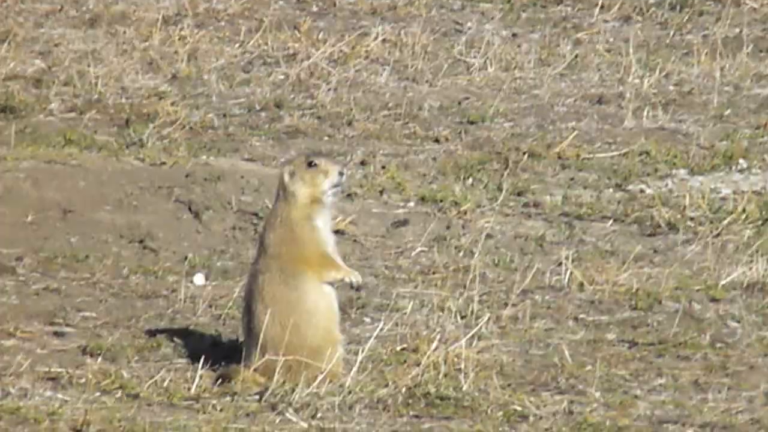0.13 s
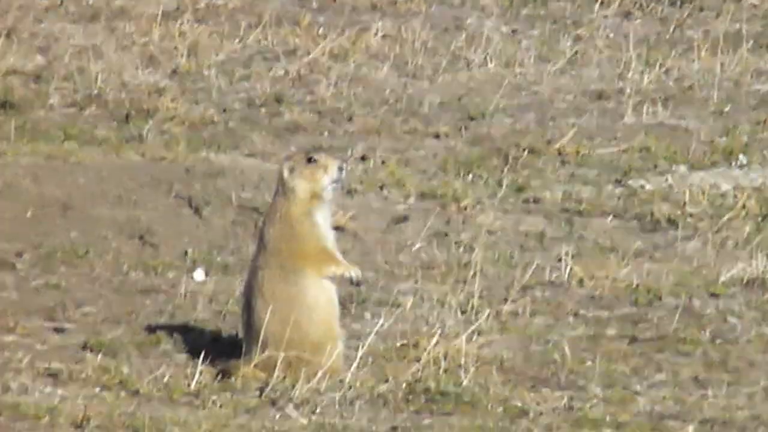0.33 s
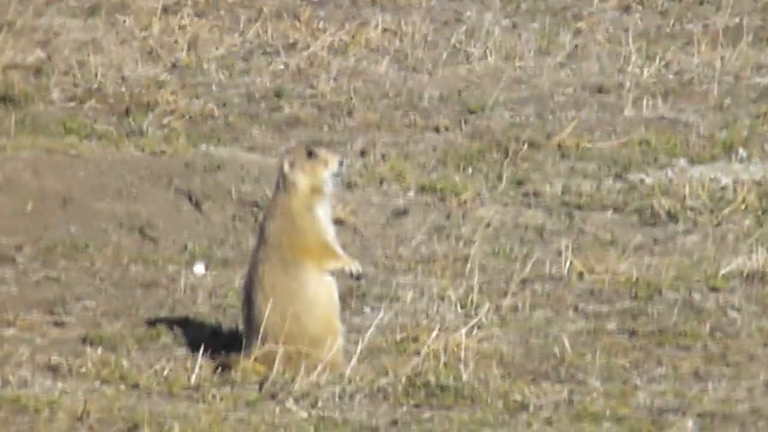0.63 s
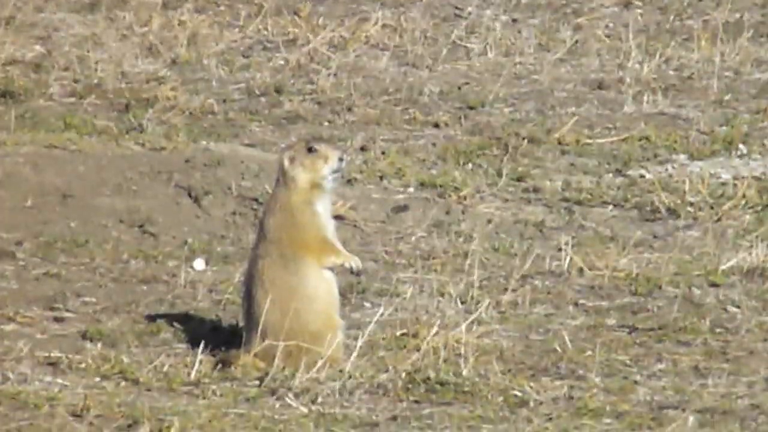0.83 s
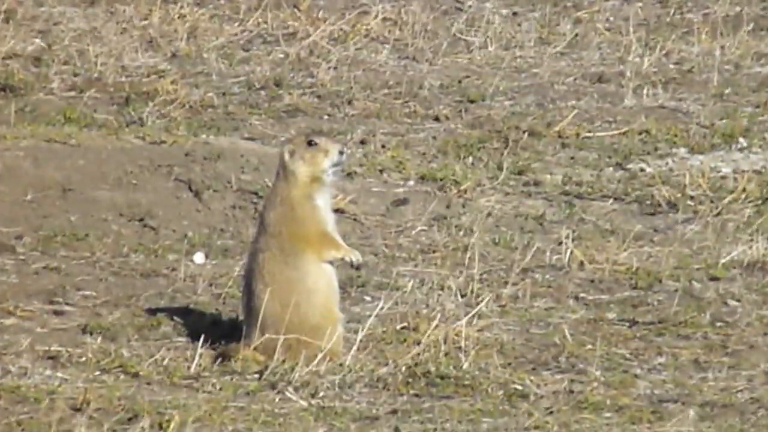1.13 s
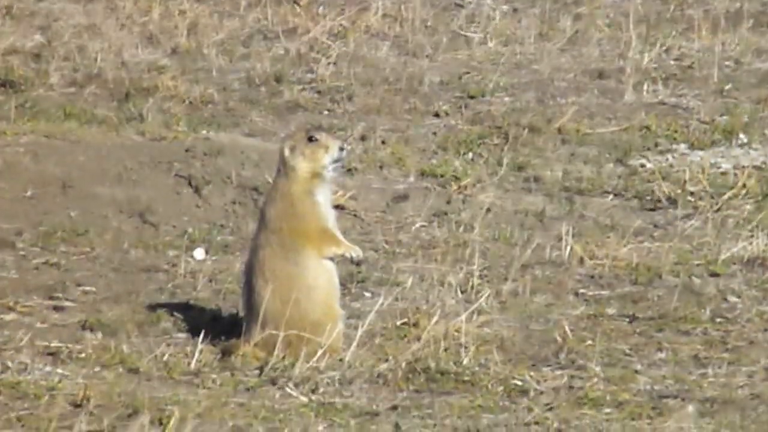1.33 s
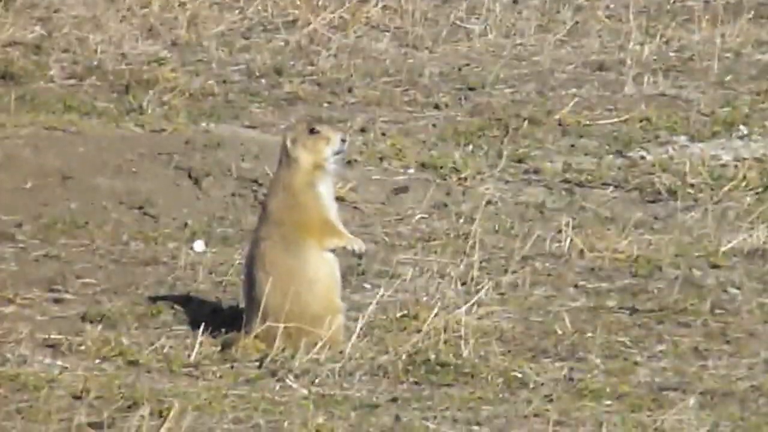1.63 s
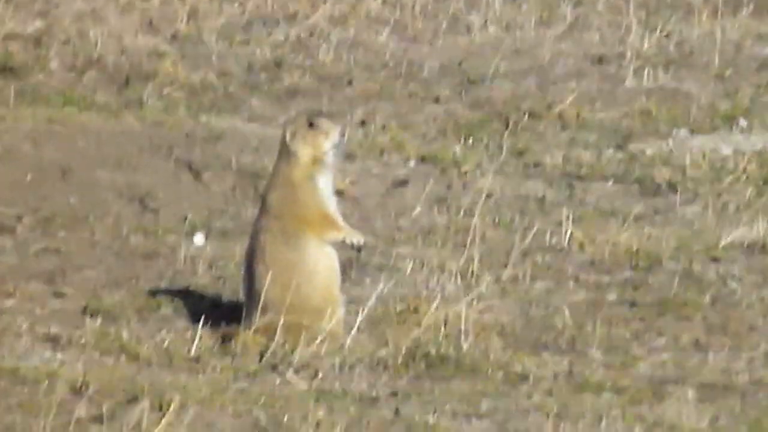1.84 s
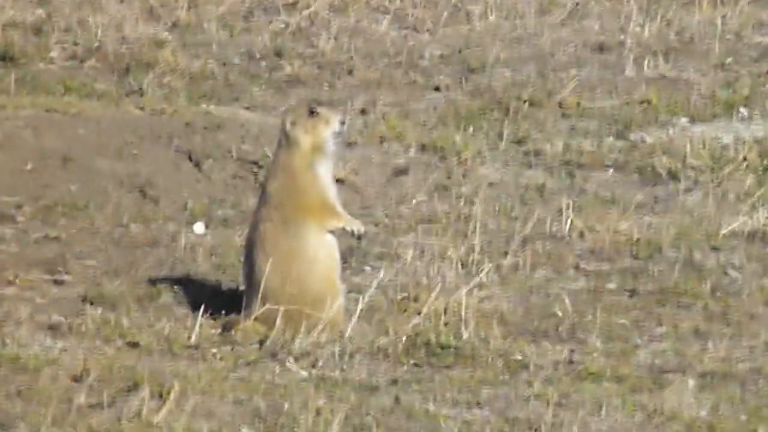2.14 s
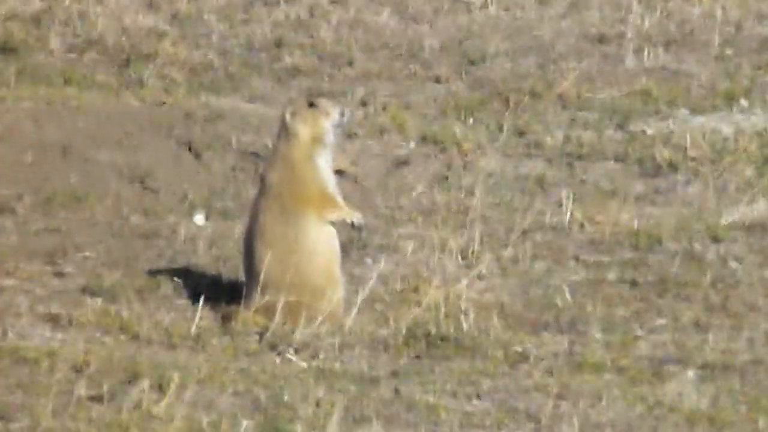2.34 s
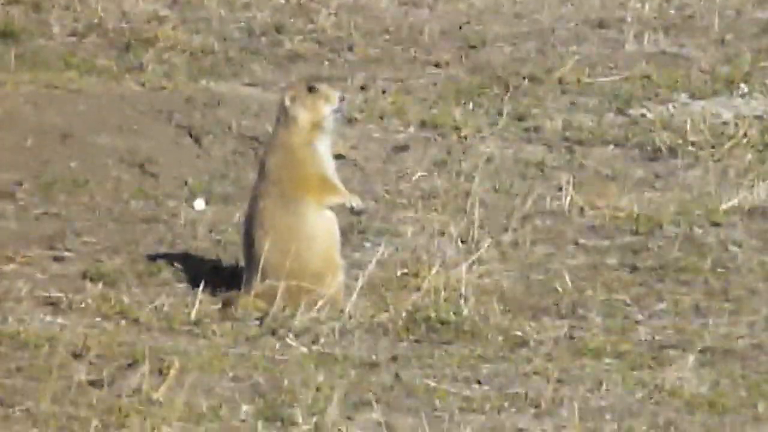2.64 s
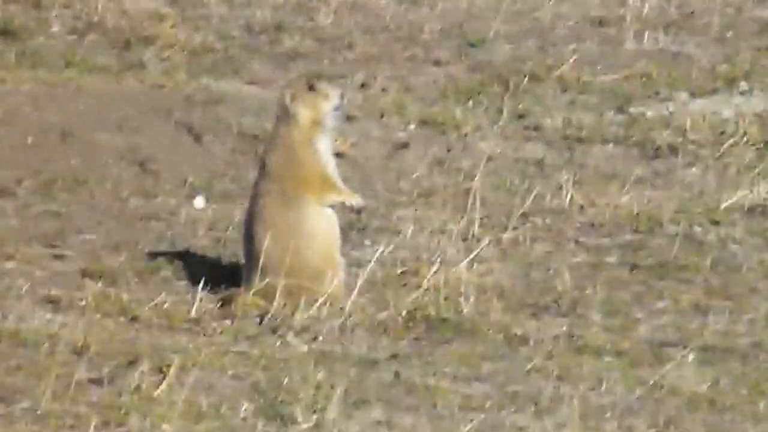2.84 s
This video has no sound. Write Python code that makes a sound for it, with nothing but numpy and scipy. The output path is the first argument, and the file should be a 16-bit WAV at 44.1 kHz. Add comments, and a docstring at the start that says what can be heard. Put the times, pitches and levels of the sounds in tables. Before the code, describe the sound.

A prairie dog gives one bright, whistling bark over wind and faint distant chirps.

```python
"""Open grassland, from a hand-held camera. After a moment of silence, wind rumbles over a faint hum.
Far off an animal chirps about three times a second, and the camera ticks now and then.
At 1.65 s a nearer prairie dog gives one bright bark: a clean rising whistle that breaks up at its top,
then sinks and fades. From 2.35 s the camera is bumped three times; a faint whine climbs at the end."""
import sys
import numpy as np
from scipy import signal
from scipy.fft import rfft, irfft
from scipy.io import wavfile
from scipy.ndimage import uniform_filter1d

SR = 44100
rng = np.random.default_rng(int(sys.argv[2]) if len(sys.argv) > 2 else 0)


def wrap_up_sound(samples):
    """Save the sound to the file named by the first command line argument, as 16-bit audio."""
    columns = np.atleast_2d(samples).T
    # keep every value between -1 and 1, then stretch to whole-number steps
    tamed = np.clip(columns, -1, 1)
    steps = np.round(tamed * 32767).astype(np.int16)
    wavfile.write(sys.argv[1], SR, steps)


N = 131859
T = np.arange(N) / SR


def amp(db):
    """Decibels to gain."""
    return 10 ** (np.asarray(db) / 20)


def unit(x):
    """Scales to rms 1."""
    return x / np.sqrt(np.mean(x ** 2) + 1e-20)


def curve(table, t):
    """The columns of a table of (s, ..) rows at the times t."""
    s, *columns = np.transpose(table)
    return [np.interp(t, s, c) for c in columns]


def colour(table, hz):
    """Reads a spectrum in dB on a log-frequency axis."""
    f, db = np.transpose(table)
    return np.interp(np.log(hz + 1), np.log(f + 1), db)


def noise(gain_at):
    """Noise of rms 1 with the given gain over frequency."""
    return unit(irfft(rfft(rng.standard_normal(N)) * gain_at(np.fft.rfftfreq(N, 1 / SR)), N))


def band(hz, width_hz):
    """Noise in one steep resonance."""
    return noise(lambda f: (1 + (2 * (f - hz) / width_hz) ** 2) ** -1.5)


def wander(hz):
    """Smooth random motion up to a rate."""
    return noise(lambda f: np.exp(-(f / hz) ** 2))


def phase(hz):
    """Running phase of a frequency curve."""
    return 2 * np.pi * np.cumsum(hz) / SR


def blow(start, rise, t60):
    """Envelope with a quick rise and an exponential decay."""
    t = np.maximum(T - start, 0)
    return np.minimum(t / rise, 1) * np.exp(-np.log(1000) * t / t60)


def bark(flutter_hz=280, jitter=.011, shimmer_db=1.5, rasp_db=-33):
    """The near animal whistles; at the top a second oscillator adds side tones and the throat rasps."""
    # Each row: time in seconds, pitch in Hz.
    pitch = [(1.646, 1990), (1.653, 2050), (1.658, 2150), (1.668, 2220), (1.674, 2280), (1.686, 2310),
             (1.693, 2490), (1.702, 2520), (1.711, 2310), (1.718, 2165), (1.729, 2098), (1.757, 2092),
             (1.77, 2056), (1.8, 2025), (1.825, 1985), (1.855, 1910)]
    # Each row: time in seconds, then the levels of harmonics one to four in dB.
    harmonics = [(1.646, -58, -64, -50, -80), (1.651, -39, -50, -33.5, -60), (1.659, -54, -36, -37.5, -54),
                 (1.667, -44, -50, -39, -48), (1.675, -27.5, -35, -41, -62),
                 (1.689, -34.5, -38, -44.5, -55), (1.701, -27, -39.5, -57, -66),
                 (1.713, -42.5, -37, -66, -70), (1.719, -39, -36, -39, -62),
                 (1.733, -38, -41.5, -43.5, -70), (1.757, -37, -43.5, -41.5, -72),
                 (1.774, -40.5, -55, -58, -76), (1.8, -41, -51, -52, -80), (1.822, -48, -63, -63, -82),
                 (1.855, -65, -58, -76, -90)]
    # How far the voice breaks up. Each row: time in seconds, roughness from 0 to 1.
    roughness = [(1.658, 0.1), (1.667, 0.54), (1.68, 0.4), (1.695, 1), (1.712, 0.86), (1.723, 0.37),
                 (1.735, .05)]
    # Each row: offset from a harmonic in flutter rates, relative level in dB at full roughness.
    side_tones = [(-2, -19), (-1, -11), (1, -4), (2, -10)]
    # Throat resonances. Each row: centre in Hz, width in Hz, relative level in dB.
    throat = [(2660, 560, -2), (3430, 2100, -8), (4940, 510, -4), (6300, 1500, -8.5)]
    hz = curve(pitch, T)[0]
    rough = np.clip(curve(roughness, T)[0], 0, 1)
    turn = phase(hz * (1 + jitter * rough * wander(500) + .0024 * wander(113)))
    flutter = phase(flutter_hz * (1 + .2 * wander(162)))
    sides = sum(amp(db) * np.exp(1j * m * (flutter + rng.uniform(0, 2 * np.pi))) for m, db in side_tones)
    voice = 0
    for k, db in enumerate(curve(harmonics, T), 1):
        gain = amp(db + shimmer_db * wander(110))
        voice += gain * np.exp(1j * (k * turn + rng.uniform(0, 2 * np.pi)))
    whistle = np.sqrt(2) * ((1 + rough * sides) * voice).real
    rasp = unit(sum(amp(db) * band(centre, width) for centre, width, db in throat))
    start, end = harmonics[0][0], harmonics[-1][0]
    gate = np.clip(np.minimum(T - start, end - T) / .0017, 0, 1)
    return gate * (whistle + amp(rasp_db) * rough * rasp)


def chirps(sag=.012, flicker_db=4):
    """The far animal's short calls arch and sag in pitch, blurred by the moving air on the way."""
    # Each row: centre in seconds, length in seconds, pitch in Hz, arch as a share of the pitch,
    # level in dB, treble tilt in dB per harmonic.
    calls = [(0.489, 0.06, 1850, .075, -44.5, 0), (0.816, 0.058, 1837, .035, -48.5, -4),
             (1.139, 0.066, 1837, 0.032, -51.5, 0), (1.483, 0.082, 1835, 0.029, -55, -0.5),
             (1.826, .06, 1860, .03, -48.5, -4.5), (2.172, .06, 1818, .03, -53, -6),
             (2.562, 0.079, 1790, 0.031, -47, -12), (2.895, .07, 1860, 0.036, -48.5, -3)]
    # Relative levels of harmonics one to five in dB, before the tilt.
    harmonics_db = [-0.5, -7, -10.5, -3, -19]
    jitter = 1 + .004 * wander(172)
    flicker = amp(flicker_db * wander(120))
    out = np.zeros(N)
    for centre, length, hz, arch, db, tilt_db in calls:
        u = np.clip(2 * (T - centre) / length, -1, 1)  # -1 to 1 across the call
        turn = phase(hz * (1 - arch * u ** 2 - sag * u ** 3) * jitter)
        tone = sum(amp(db + h + k * tilt_db) * np.sin((k + 1) * turn) for k, h in enumerate(harmonics_db))
        out += (1 - u ** 2) * tone
    return np.sqrt(2) * flicker * out


def scatter(calls, level_db=-17.5, t60_s=.17):
    """Ground and grass return a thin, short tail to the microphone."""
    t = np.arange(SR // 2) / SR
    echoes = rng.standard_normal(len(t)) * (rng.random(len(t)) < .05)
    tail = echoes * np.exp(-np.log(1000) * t / t60_s) * (t > .004)
    return amp(level_db) * signal.fftconvolve(calls, tail / np.linalg.norm(tail))[:N]


def handling():
    """Right at the microphone, the camera gives dry ticks and takes dull bumps with a little rustle."""
    # Each row: start in seconds, level in dB, pitch in Hz.
    ticks = [(.764, -33, 830), (.861, -30, 1150), (.958, -35, 1200), (1.161, -35, 1000), (1.268, -36, 1000),
             (1.428, -31, 1150), (1.91, -35, 900)]
    # Each row: start in seconds, thud level in dB, rustle level in dB.
    bumps = [(2.348, -29.5, -43.5), (2.74, -39, -63), (2.797, -43, -70)]
    # The two spectra of a bump. Each row: frequency in Hz, relative density in dB.
    thud_spectrum = [(40, -33), (110, -15), (200, -17), (300, 8.5), (420, -10), (530, -7), (650, -4.5),
                     (950, -3), (1800, -38), (4000, -48)]
    rustle_spectrum = [(1000, -12), (2500, -5), (4200, -10), (5200, 6), (6200, -10), (9500, -1),
                       (12000, -17), (16000, -25)]
    ticking = sum(amp(db) * blow(start, rise=.0009, t60=.028) * band(hz, width_hz=700)
                  for start, db, hz in ticks)
    thud = noise(lambda f: amp(colour(thud_spectrum, f)))
    rustle = noise(lambda f: amp(colour(rustle_spectrum, f)))
    bumping = sum(blow(start, rise=.0043, t60=.14) * (amp(thud_db) * thud + amp(rustle_db) * rustle)
                  for start, thud_db, rustle_db in bumps)
    return ticking + bumping


def wind(level_db=-39.5, gust_top_hz=2980, flicker_db=.6):
    """Wind over open ground: a lumpy low end that follows the gusts, under an even hiss."""
    # Each row: frequency in Hz, relative density in dB.
    air_spectrum = [(15, -64), (25, -34), (75, -28), (99, -16.5), (165, -8.5), (204, -3), (290, -7.5),
                    (340, -1.5), (369, -3.5), (400, -1.5), (1030, -9.5), (1340, -12), (1540, -16.5),
                    (1860, -12.5), (2180, -19), (3640, -24.5), (4890, -27), (7130, -28), (7730, -28),
                    (13200, -32), (15600, -35)]
    # Each row: time in seconds, relative wind strength in dB.
    gusts = [(.15, -2.5), (.38, -2), (.55, 1), (.85, -0.25), (1.05, -2), (1.6, -1.5), (2, -1), (2.25, .5),
             (2.6, -1), (2.8, -1), (2.99, -1)]
    air = noise(lambda f: amp(colour(air_spectrum, f)))
    hz, t, spectra = signal.stft(air, SR, nperseg=512)
    grain = rng.standard_normal(spectra.shape)
    patches_db = unit(uniform_filter1d(uniform_filter1d(grain, size=6, axis=0), size=8, axis=1))
    swing_db = curve(gusts, t)[0] + patches_db + flicker_db * rng.standard_normal(len(t))
    spectra *= amp(swing_db / (1 + (hz[:, None] / gust_top_hz) ** 2))
    return amp(level_db) * unit(signal.istft(spectra, SR, nperseg=512)[1][:N])


def hum():
    """Faint wavering tones behind the wind, and the camera's own thin, high whine."""
    # Each row of both: centre in Hz, level in dB, width in Hz.
    hum_tones = [(110.8, -66, 10.4), (205.5, -55, 30), (336.4, -52.5, 3), (684, -57.5, 38), (999, -61, 22),
                 (2557, -63.5, 78)]
    camera_tones = [(10045, -73, 150), (13410, -78, 200)]
    return sum(amp(db) * band(hz, width) for hz, db, width in hum_tones + camera_tones)


def rumble():
    """A low band of noise swells a few times in the last second."""
    # Each row: time in seconds, level in dB.
    swells = [(2.2, -64), (2.34, -57), (2.39, -46), (2.46, -57), (2.58, -59), (2.66, -44), (2.72, -54),
              (2.81, -40.5), (2.87, -59), (2.99, -45)]
    return amp(curve(swells, T)[0]) * band(217, width_hz=114)


def rising_whine(start_s=2.84, fade_s=.05, base_hz=1580, climb_hz_per_s=1200, hiss_db=-61):
    """A faint, thin whine with some hiss fades in and climbs."""
    # Each row: multiple of the base pitch, level in dB.
    partials = [(2, -58), (2.5, -73), (3, -69)]
    t = np.maximum(T - start_s, 0)
    turn = phase((base_hz + climb_hz_per_s * t) * (1 + .0075 * wander(200)))
    tones = np.sqrt(2) * sum(amp(db) * np.sin(k * turn) for k, db in partials)
    hiss = amp(hiss_db) * band(4200, width_hz=5500)
    return np.minimum(t / fade_s, 1) * (tones + hiss)


def scene():
    """Both animals and the background reach the left and right channels alike."""
    calls = bark() + chirps()
    mono = calls + scatter(calls) + wind() + hum() + rumble() + rising_whine() + handling()
    return np.array([mono, mono])


def record(dry):
    """The camera starts after a moment of silence, with a narrow notch and a band limit."""
    start_s, notch_hz, top_hz = .149, 7900, 15720
    notched = signal.lfilter(*signal.iirnotch(notch_hz, Q=35, fs=SR), dry)
    lowpass = signal.firwin(511, top_hz, window=("kaiser", 9), fs=SR)
    return signal.oaconvolve(notched * (T >= start_s), lowpass[None], "same")


dry = scene()
out = record(dry)
wrap_up_sound(out)
```